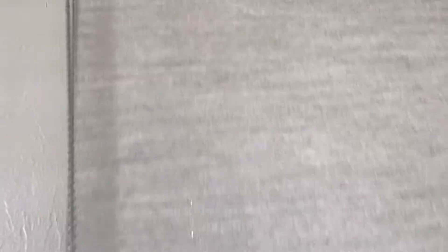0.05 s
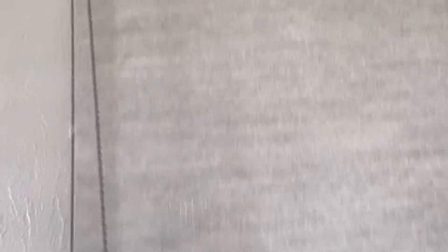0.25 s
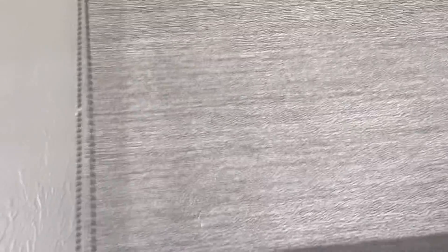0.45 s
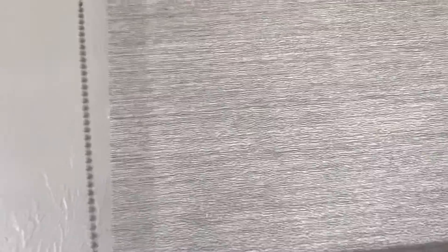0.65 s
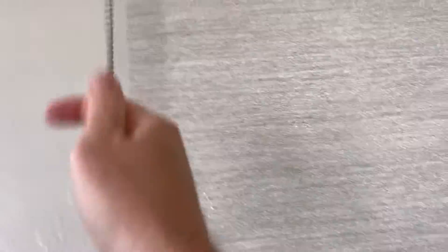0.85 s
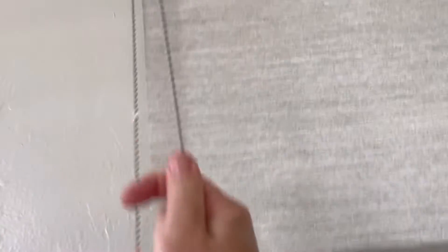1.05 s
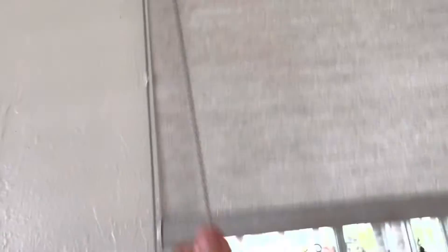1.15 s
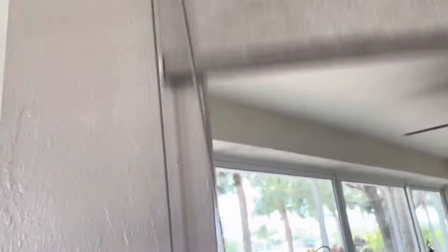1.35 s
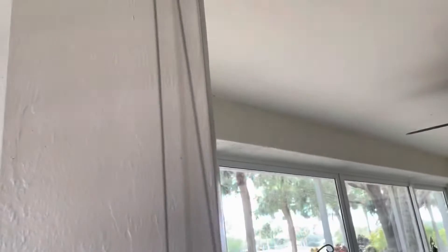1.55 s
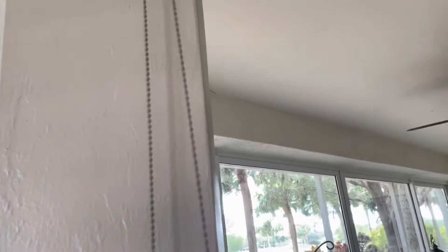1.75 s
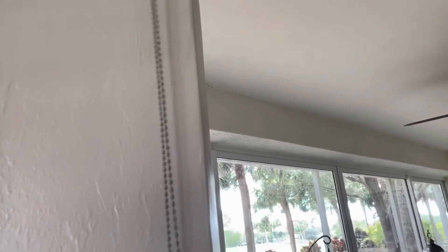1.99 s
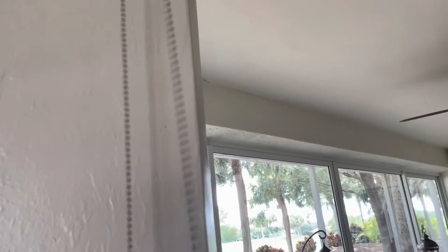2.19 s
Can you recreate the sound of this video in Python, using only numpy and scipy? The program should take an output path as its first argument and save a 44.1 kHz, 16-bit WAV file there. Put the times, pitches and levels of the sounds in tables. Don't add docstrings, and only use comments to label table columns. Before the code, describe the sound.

A fabric roller shade is pulled up in two goes: soft cloth rubbing and low thuds, a pause with light chain taps, then a louder rasping wind with ticking beads and closing clatter, close in a living room.

```python
import sys
import numpy as np
from scipy import signal
from scipy.fft import rfft, irfft, next_fast_len
from scipy.io import wavfile

SR = 44100
rng = np.random.default_rng(int(sys.argv[2]) if len(sys.argv) > 2 else 0)


def dump_mix(stems):
    frames = np.atleast_2d(stems).T
    limited = np.clip(frames, -1, 1)
    pcm = np.round(limited * 32767).astype(np.int16)
    wavfile.write(sys.argv[1], SR, pcm)


def boost_factor(decibels):
    exponent = np.asarray(decibels, float) / 20
    return 10 ** exponent


N = 97990


def at_hz(points, hz, column=1):
    p = np.array(points)
    return np.interp(np.log(hz + 1), np.log(p[:, 0]), p[:, column])


def in_time(rows):
    s, db = np.transpose(rows)
    return np.interp(np.arange(N) / SR, s, db)


def rms_one(x):
    return x / np.sqrt(np.mean(x ** 2) + 1e-20)


def colour(x, spectrum):
    gain = boost_factor(at_hz(spectrum, np.fft.rfftfreq(len(x), 1 / SR)))
    return rms_one(irfft(rfft(x) * gain, len(x)))


def band_pass(x, low_hz, high_hz):
    return signal.sosfilt(signal.butter(2, [low_hz, high_hz], "band", fs=SR, output="sos"), x)


def drift(rate_hz):
    r = np.exp(-2 * np.pi * rate_hz / SR)
    return rms_one(signal.lfilter([1], [1, -2 * r, r * r], rng.standard_normal(N + SR))[SR:])


def patchy(x):
    patchy_db, rate_hz = 2.5, 14
    edges_hz = np.geomspace(60, 18000, 10)
    out = np.zeros(N)
    for k, (low, high) in enumerate(zip(edges_hz, edges_hz[1:])):
        out += band_pass(x, low, high) * boost_factor(patchy_db * drift(rate_hz)) * (-1) ** k
    return out


def ring(x, hz, t60_s):
    r, w = boost_factor(-60 / (t60_s * SR)), 2 * np.pi * hz / SR
    return signal.lfilter([0, np.sin(w)], [1, -2 * r * np.cos(w), r * r], x + 1e-18)


def contact(s, length_s):
    t = np.arange(int(.06 * SR)) / SR
    length_s = max(length_s, 1e-3)
    burst = rng.standard_normal(len(t)) * np.exp(-2 * t / length_s)
    burst = burst * np.minimum(4 * t / length_s, 1)
    return int(s * SR), burst / np.sqrt(np.sum(burst ** 2))


def strike(hits, modes):
    out = np.zeros(N)
    for k, (hz, db, t60_s) in enumerate(modes):
        force = np.zeros(N + SR)
        for start, burst, gains in hits:
            force[start:start + len(burst)] += burst * gains[k] * boost_factor(db) * (-1) ** k
        out += ring(force[:N], hz, t60_s)
    return out


def quiet_room():
    # (frequency [Hz], density [dB per Hz])
    floor_spectrum = [(18, -15), (30, -40), (140, -3), (288, -13.5), (328, -3), (403, -10.5), (674, -37),
                      (14000, -92)]
    level_db = -57.5
    return np.array([boost_factor(level_db) * colour(rng.standard_normal(N), floor_spectrum) for _ in range(2)])


def sway():
    # (time [s], level [dB])
    sway_level = [(0.0, -34.5), (0.14, -80), (0.38, -42), (0.39, -77), (0.44, -39), (0.5, -37), (0.86, -53),
                  (0.92, -39), (1.04, -85), (1.68, -44), (1.74, -55), (1.77, -46), (2.0, -46), (2.22, -57)]
    low = band_pass(rng.standard_normal(N + SR), 42, 125)[SR:]
    return rms_one(low) * boost_factor(in_time(sway_level) - 9.0)


def thuds():
    # (time [s], level [dB], pitch [Hz])
    sheet_thuds = [
        (0.002, -38, 82.6),
        (0.441, -40, 59),
        (0.489, -32.5, 52.4),
        (0.574, -38, 59),
        (.69, -54, 49),
        (.91, -52, 59.5),
        (1.12, -50, 60),
        (1.23, -51, 55),
    ]
    t60_s = 0.24
    out = np.zeros(N)
    for s, db, hz in sheet_thuds:
        t = np.maximum(np.arange(N) / SR - s, 0)
        out += boost_factor(db - 60 * t / t60_s) * np.sin(2 * np.pi * hz * t) * np.minimum(hz * t, 1)
    return out


def bumps():
    # (time [s], peak [dB], length [s])
    bar_bumps = [(0.42, -24, 0.043), (0.427, -45, 0.0036), (0.448, -32, 0.006), (0.474, -25, 0.0077),
                 (0.514, -25.5, 0.0048), (.56, -33, .008), (0.589, -30.5, 0.0047), (.64, -34.5, 0.011),
                 (0.8894, -29.5, 0.039), (0.93, -36.5, 0.01), (1.766, -30, 0.01), (1.886, -36, .004),
                 (1.899, -31, 0.008), (1.906, -26, 0.003), (1.916, -21, 0.012), (1.974, -33, .006),
                 (1.981, -27, 0.003), (1.99, -24, 0.012), (1.999, -27, .006), (2.011, -23, 0.006),
                 (2.022, -25, 0.0064), (2.038, -24, 0.024), (2.057, -25, 0.0033), (2.073, -25.5, 0.0094),
                 (2.162, -31, 0.007)]
    cuts_hz = [2500, 500, 1210, 405, 303, 353, 304, 350, 1530, 504, 1000, 600, 490, 400, 1350, 1150, 300,
               1750, 606, 850, 600, 500, 454, 397, 404]
    # (frequency [Hz], level [dB], t60 [s])
    bar_modes = [(110, -8, .06), (175, -1, .05), (255, -3, .04), (325, -3, .04), (405, -2, .04),
                 (2050, -26, .04), (520, 0, .025), (680, 1, .02), (880, 2, .014), (1150, 1, .009),
                 (1550, 1, .006), (2100, 0, .003), (3000, 4, .004), (4400, 5, .003)]
    hz, hits = np.array(bar_modes)[:, 0], []
    for (s, db, length_s), cut_hz in zip(bar_bumps, cuts_hz):
        start, burst = contact(s, length_s)
        burst[:24] -= np.hanning(24) / 12
        level = boost_factor(db - 11 + rng.normal(0, 1.5, len(bar_modes)))
        hits.append((start, burst, level / (1 + (hz / cut_hz) ** 2)))
    return strike(hits, bar_modes)


def slaps():
    slap_s = [.058, .242, .3985, .605, .6923, .7731, .7996, .845, .8899, .94, 1.026, 1.152, 1.229, 1.293,
              1.766, 1.9096, 1.988, 2.004, 2.1495, 2.185]
    # (peak [dB], length [s], tilt [dB per octave], ring of long modes [dB])
    slap_shapes = [(-34, 0.0033, -14.5, -17), (-32.5, 0.0092, 3, -15), (-51, 0.0066, 14.5, -9),
                   (-54.5, 0.0035, -3, -14), (-62.5, 0.0032, -15.5, -15), (-44, 0.011, -3, -1.5),
                   (-40, 0.0074, 1.5, -2.5), (-43, 0.0093, 3, -15), (-30.5, 0.0089, -3, -6),
                   (-52, 0.0046, -10, -10), (-45, 0.0022, 0, -14), (-30, 0.01, -1, -12),
                   (-35, 0.0065, -1, -21), (-18, 0.016, 2.8, -13), (-30, 0.0034, -4.5, -20),
                   (-21.5, 0.01, -5.8, -18), (-29.5, 0.0085, -12.5, -18), (-43, 0.014, -7.5, 0.5),
                   (-37.5, 0.015, -12.5, -5.5), (-47.5, 0.0028, 7, -1)]
    # (frequency [Hz], level [dB], t60 [s])
    chain_modes = [(1900, -11, .07), (2040, -14, .06), (5250, -13, .03), (1600, -1, .0022), (2600, 2, .002),
                   (3700, 3, .002), (4800, 2, .002), (6400, 2, .0016), (8300, 2, .0014), (10500, 0, .0012),
                   (13500, -2, .001)]
    octaves = np.log2(np.array(chain_modes)[:, 0] / 4000)
    long = np.array(chain_modes)[:, 2] > .02
    hits = []
    for s, (db, length_s, tilt, ring_db) in zip(slap_s, slap_shapes):
        gains_db = db - 6 + tilt * octaves + ring_db * long + rng.normal(0, 1.5, len(chain_modes))
        hits.append((*contact(s, length_s), boost_factor(gains_db)))
    return strike(hits, chain_modes)


def knocks():
    # (time [s], level [dB])
    tube_knocks = [
        (0.062, -40),
        (0.139, -54),
        (1.049, -39),
        (1.314, -37.5),
        (1.357, -30),
        (1.507, -27.5),
        (1.634, -30),
        (1.765, -27.5),
    ]
    # (frequency [Hz], level [dB], t60 [s])
    knock_modes = [(212, 2, .08), (97, -10, .1), (650, -9, .05), (1225, -14, .04)]
    push = np.hanning(int(.018 * SR))
    t = np.arange(len(push)) / SR
    out = np.zeros(N)
    for hz, db, t60_s in knock_modes:
        force = np.zeros(N + SR)
        swell = push * np.cos(2 * np.pi * hz * t) * 4 / len(push)
        for s, level_db in tube_knocks:
            start = int(s * SR)
            force[start:start + len(push)] += boost_factor(level_db + db) * swell
        out += ring(force[:N], hz, t60_s)
    return out


def beads(pull_db):
    # (time [s], peak [dB])
    loud_ticks = [(1.0274, -84), (1.0553, -69), (1.0703, -66), (1.0947, -50), (1.124, -43.5), (1.1514, -47),
                  (1.177, -45), (1.1975, -45), (1.2269, -47), (1.2269, -39), (1.2538, -39), (1.294, -34),
                  (1.3273, -38.5), (1.3711, -34.5), (1.406, -45), (1.425, -43), (1.4454, -48),
                  (1.4728, -57), (1.4848, -36), (1.5087, -42), (1.5343, -36), (1.5477, -35.5), (1.579, -46),
                  (1.624, -39), (1.7103, -42), (1.7654, -47)]
    # (frequency [Hz], level [dB], t60 [s])
    bead_modes = [(5530, -24, 0.0015), (9180, 12, 0.0017), (10750, 3, 0.0058), (11900, -40, 0.0036)]
    slow_per_s, fast_per_s, jitter = 68, 66, .3
    rattle_db, tick_db, rattle_from_speed = 8, -6.5, .55
    speed = np.clip((pull_db - pull_db.max() + 22) / 20, 0, 1)
    beads_per_s = (slow_per_s + (fast_per_s - slow_per_s) * speed) * (1 + jitter * drift(30))
    passing = np.diff(np.floor(np.cumsum(beads_per_s) / SR), prepend=0)
    scrape = rng.standard_normal(60) * np.hanning(60) / 5
    force = np.convolve(passing, scrape)[:N] * rng.uniform(0.71, 1, N)
    force = force * boost_factor(pull_db + rattle_db + 1.1 * drift(72)) * (speed > rattle_from_speed)
    for s, db in loud_ticks:
        force[int(s * SR)] += boost_factor(db + tick_db)
    return sum(boost_factor(db) * ring(force, hz, t60_s) for hz, db, t60_s in bead_modes)


def cloth(pull_db):
    # (frequency [Hz], density [dB per Hz])
    rub_spectrum = [(300, 4.5), (850, -5), (1300, -2.5), (3000, -2), (4300, 0), (7500, 2.5), (11000, -16.5),
                    (16000, -5.5)]
    # (frequency [Hz], width [Hz], level [dB])
    tube_modes = [(212.7, 25.6, -4), (321, 59, -10), (409, 52, -14), (555, 40, -9.5), (588, 70, -13),
                  (648.3, 24, -10), (706, 12, -10), (772.6, 21.7, -8.5), (825, 42, -8), (888, 64, -10.5),
                  (1215, 25, -24.5), (1740, 28, -23), (4330, 290, -28.5), (5660, 1100, -8.5)]
    grains_per_s, grain_spread_db = 9000, 2.5
    tube_db, tube_follows, flutter_db, wander_db = -45, 0.68, 1.5, 2.5
    grain_db = grain_spread_db * np.minimum(rng.exponential(1, N), 5)
    grains = (rng.random(N) < grains_per_s / SR) * boost_factor(grain_db) * rng.choice([-1, 1], N)
    rub = colour(patchy(grains), rub_spectrum)
    rub = rub * boost_factor(pull_db + 2.5 + 1.2 * drift(40) + 1.2 * drift(15))
    tube = np.zeros(N)
    for k, (hz, width_hz, db) in enumerate(tube_modes):
        mode = rms_one(ring(grains, hz, 2.16 / width_hz))
        tube += boost_factor(db) * mode * (-1) ** k * boost_factor(wander_db * drift(4.0))
    tube_level_db = tube_db + tube_follows * (pull_db - pull_db.max()) + flutter_db * drift(18)
    return rub + tube * boost_factor(tube_level_db)


def room(x):
    # (frequency [Hz], t60 [s])
    decay = [(100, 0.23), (500, 1), (2000, 0.45), (6000, 0.19), (14000, 0.13)]
    room_db = 3.5
    t, edges_hz = np.arange(SR // 2) / SR, np.geomspace(30, 18000, 11)
    tail = 0
    for low, high in zip(edges_hz, edges_hz[1:]):
        band = band_pass(rng.standard_normal((2, len(t))), low, high)
        t60_s = at_hz(decay, np.sqrt(low * high))
        tail = tail + band * boost_factor(-60 * t / t60_s) * np.sqrt(2 * np.log(1000) / (t60_s * SR))
    tail = boost_factor(room_db) * tail * np.clip(t / 0.00067, 0, 1)
    early = rng.standard_normal(len(t)) * np.exp(-t / 0.008)
    tail[0, 0] += 1
    tail[1] += early / np.sqrt(np.sum(early ** 2))
    return signal.fftconvolve(x[None], tail, axes=1)[:, :N]


def scene():
    # (time [s], level [dB])
    pull = [(0, -55.5), (.08, -52.5), (.23, -51), (.34, -59.5), (.41, -66.5), (.5, -75), (.85, -115),
            (.9, -65), (1.0, -71.5), (1.08, -59), (1.2, -50.5), (1.27, -44), (1.33, -45), (1.52, -44.5),
            (1.7, -47), (1.76, -56.5), (1.87, -59.5), (2.0, -67), (2.22, -91)]
    bar_room_share, chain_room_share = .42, .65
    apart_cut_hz, slap_aside_db, leak_db = 6800, -2, -34
    pull_db, bar, chain = in_time(pull), bumps(), slaps()
    shade = sway() + bar_room_share * bar + chain_room_share * chain + beads(pull_db) + cloth(pull_db)
    near = (1 - bar_room_share) * bar + (1 - chain_room_share) * chain
    shared, apart = quiet_room() + room(shade) + near
    shared = shared + thuds() + knocks()
    dull = signal.cheby2(10, 60, apart_cut_hz, fs=SR, output="sos")
    slap_treble = chain - signal.sosfilt(dull, chain)
    aside = signal.sosfilt(dull, apart) + boost_factor(slap_aside_db) * slap_treble + boost_factor(leak_db) * apart
    return np.array([shared, aside])


def roll_off(x):
    return signal.sosfilt(signal.butter(12, 16480, fs=SR, output="sos"), x)


def record(dry):
    # (frequency [Hz], likeness [0-1], left lead [rad], left over right [dB])
    ports = [(150, .97, 0, 0), (400, .92, -.2, -.5), (700, .4, -1, -.4), (2000, .5, 0, -1.5),
             (4500, .6, -.4, -3), (6400, .9, -1.2, -3), (7100, .9, -2.9, 0), (7800, .9, -np.pi, 0),
             (8800, .9, -np.pi, 0), (10500, .9, -2 * np.pi, 0), (12500, .9, -2 * np.pi, 0),
             (13700, .9, -3 * np.pi, 0), (14900, .9, -3 * np.pi, 0), (15600, .9, -2.92 * np.pi, 0),
             (16300, .9, -3 * np.pi, 0)]
    size = next_fast_len(N + 2048)
    hz, (shared, apart) = np.fft.rfftfreq(size, 1 / SR), rfft(dry, size)
    alike = np.clip(at_hz(ports, hz), 0, 1)
    half = np.exp(.5j * at_hz(ports, hz, column=2)) * boost_factor(at_hz(ports, hz, column=3) / 2)
    mid = np.sqrt((1 + alike) / 2) * shared
    side = np.sqrt((1 - alike) / 2) * apart
    mix = irfft(np.array([(mid + side) * half, (mid - side) / half]), size)[:, :N]
    return roll_off(mix)


dry = scene()
out = record(dry)
dump_mix(out)
```